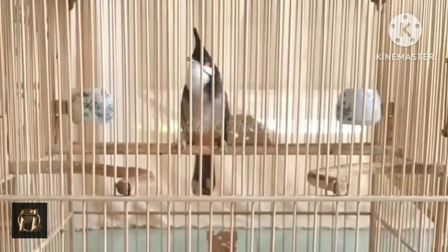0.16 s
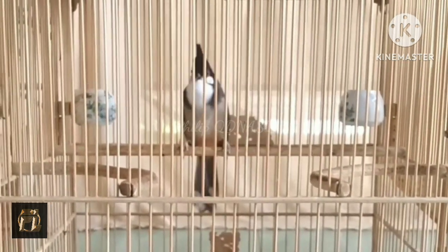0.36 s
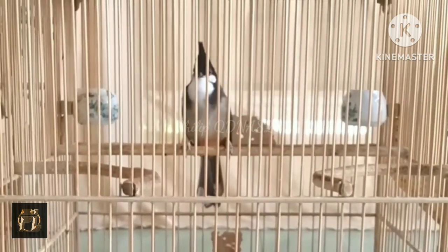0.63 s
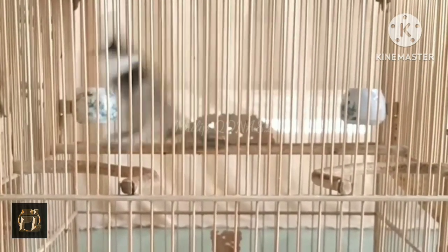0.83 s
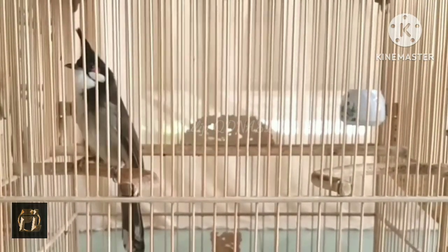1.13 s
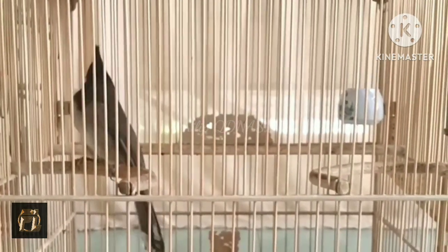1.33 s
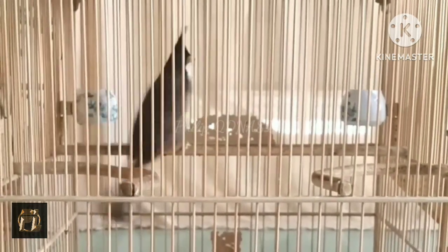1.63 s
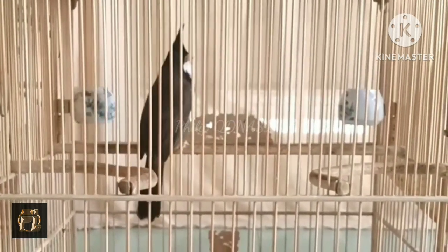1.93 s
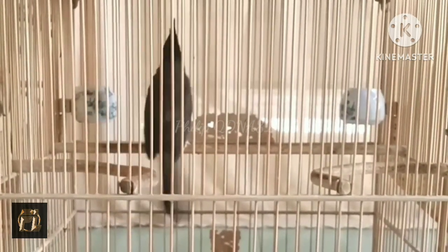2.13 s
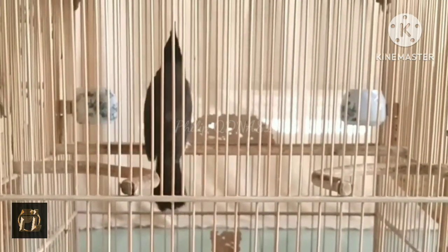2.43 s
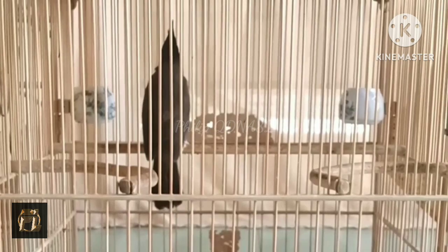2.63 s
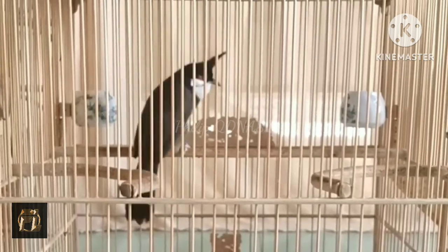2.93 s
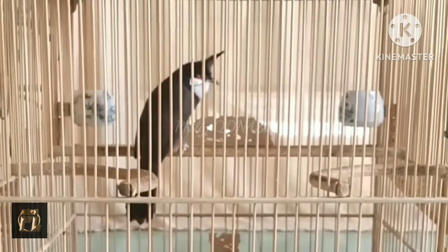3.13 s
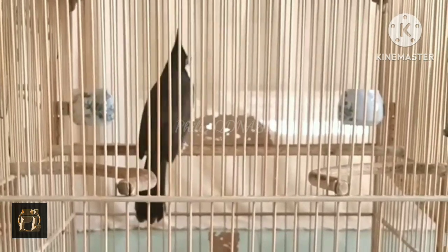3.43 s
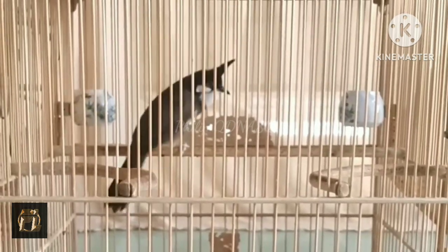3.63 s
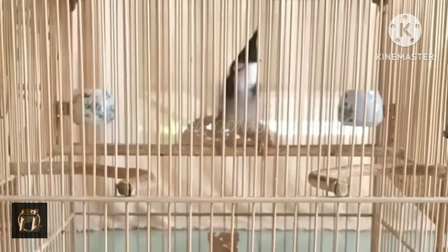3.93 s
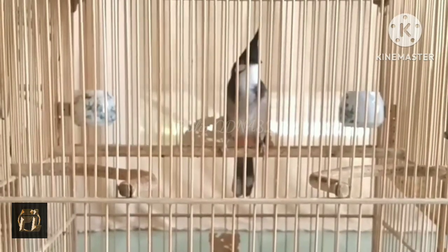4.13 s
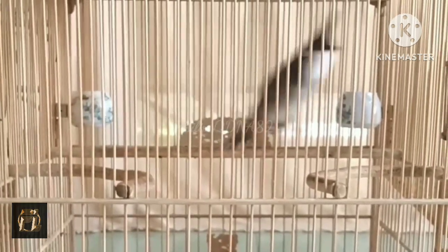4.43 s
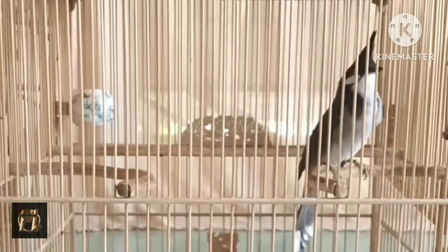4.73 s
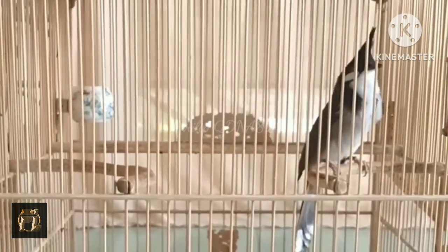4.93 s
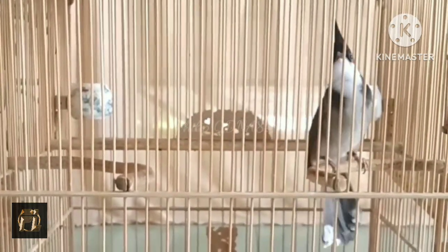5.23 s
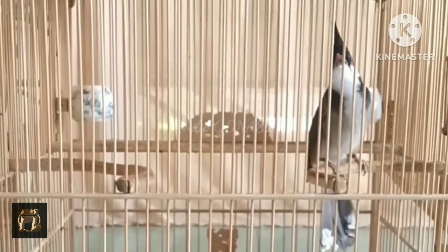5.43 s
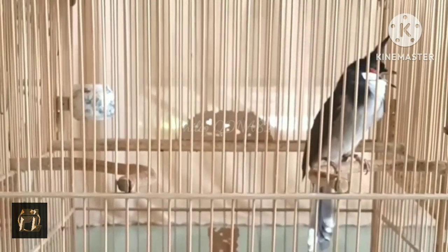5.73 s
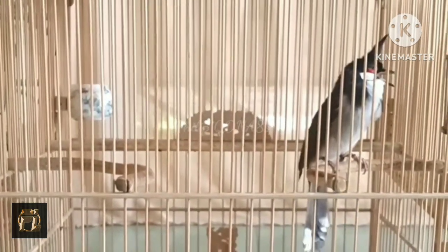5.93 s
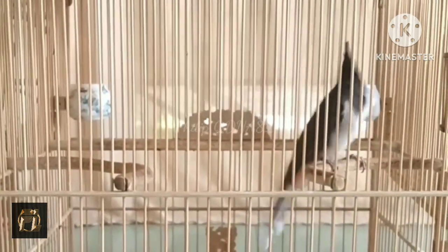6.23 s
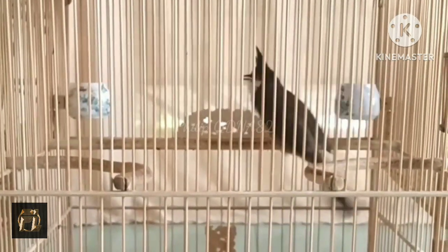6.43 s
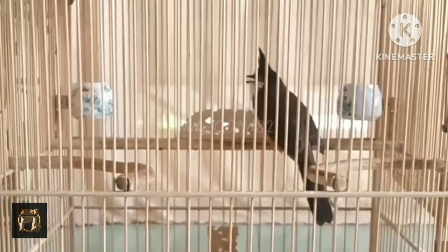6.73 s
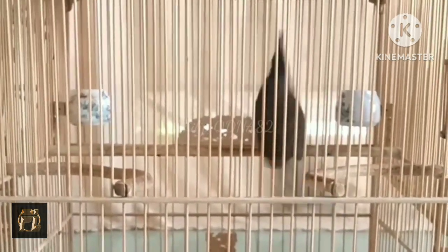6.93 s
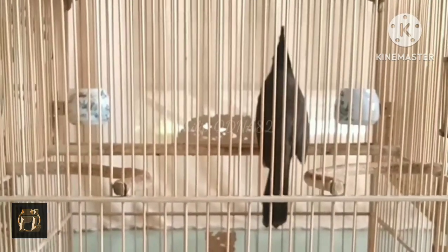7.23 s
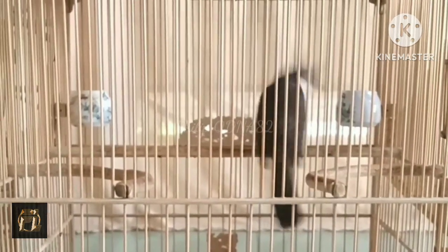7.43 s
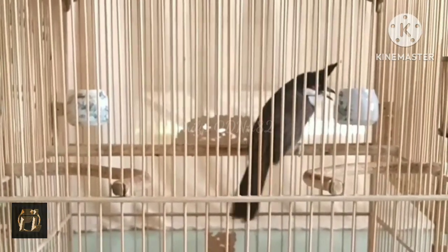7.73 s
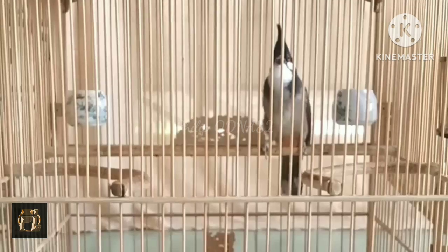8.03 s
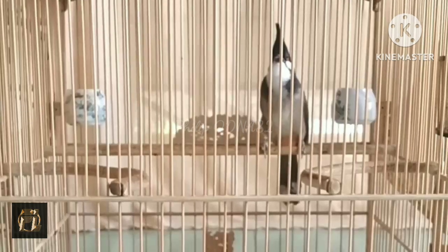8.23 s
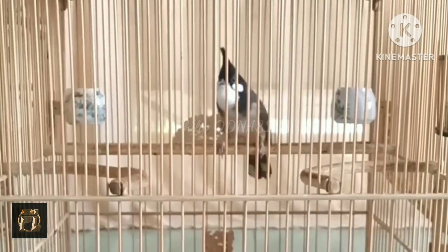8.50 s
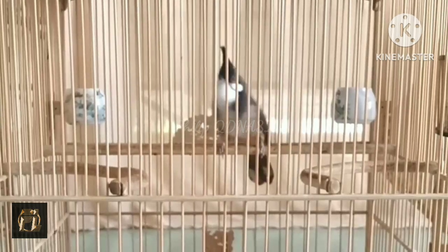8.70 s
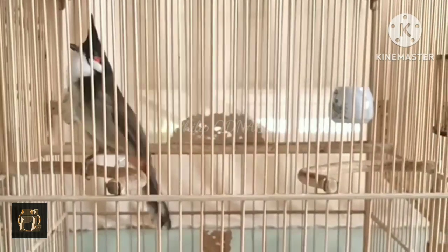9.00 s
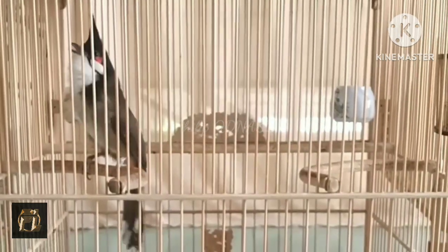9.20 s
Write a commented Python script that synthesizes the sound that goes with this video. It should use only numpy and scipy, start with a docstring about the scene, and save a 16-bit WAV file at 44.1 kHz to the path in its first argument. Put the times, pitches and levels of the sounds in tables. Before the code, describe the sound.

Close stereo pickup in a reverberant indoor room: a clipped whistle at once, a sharp call, then after a pause another call and a quick warbled run. Softer neighbouring birds chatter in the middle, followed by more single calls, a second, shorter phrase and a last call near the end. Quiet perch knocks, dry ticks, faint room hiss and a low motor hum lie beneath.

```python
"""Caged bulbul in a hard-walled room

A bulbul sings in a bamboo cage, so close that its loud notes overload the microphones (hard clipping).
Its whits and song notes are fluttering whistles; other birds answer and twitter, with more of the room.
The bird hops between perches (damped bamboo modes and claw clicks) and beats its wings (puffs of noise).
Dry ticks, a low hum and drifting room noise lie below; twice the upper range briefly drops away."""
import sys
import numpy as np
from scipy import signal
from scipy.fft import rfft, irfft
from scipy.io import wavfile
from scipy.ndimage import uniform_filter1d, map_coordinates

SR = 44100
rng = np.random.default_rng(int(sys.argv[2]) if len(sys.argv) > 2 else 0)


def put_to_file(sound):
    """Save the sound as 16-bit audio at rate SR, in the file named by the first command-line argument."""
    columns = np.atleast_2d(sound).T  # one column per channel
    safe = np.clip(columns, -1, 1)
    whole_steps = np.round(safe * 32767)
    wavfile.write(sys.argv[1], SR, whole_steps.astype(np.int16))


N = 412776


def gain_of(db):
    """Level in decibels to amplitude ratio."""
    return 10 ** (np.asarray(db) / 20)


def evened(x):
    """Normalization to an rms of one."""
    return x / np.sqrt(np.mean(x ** 2) + 1e-20)


def read(points, hz):
    """Linear interpolation of a spectrum table along a log-frequency axis."""
    f, value = np.transpose(points)
    return np.interp(np.log(hz + 1), np.log(f + 1), value)


def add(mix, s, sound):
    """Superposition: a sound is summed into the mix from time s."""
    part = mix[..., max(round(s * SR), 0):][..., :sound.shape[-1]]
    part += sound[..., :part.shape[-1]]


def wander(size, rate_hz):
    """Band-limited random fluctuation: noise of rms about one, smoothly interpolated at the given rate."""
    at = np.arange(size) * rate_hz / SR
    return map_coordinates(rng.standard_normal(4096), [at], order=3, mode="wrap")


def bulbul():
    """Directional source: the way the near bird faces sets each note's channel balance and overtones."""
    # short calls: t/s, level/dB, pitch factor, left re right/dB
    calls = [(0.305, -3, 0.985, 5.5), (1.85, -5.5, .99, 6), (5.094, -1, 1.012, 1), (6.993, -3.5, 1.0, 2),
             (9.145, -2, 1.011, 1)]
    # song notes: t/s, rise/s, fall/s, start f/Hz, main f/Hz, end f/Hz, level/dB, warble as share of pitch
    song = [(0, 0.001, 0.034, 3050, 2965, 2925, 2, 0.1), (2.152, 0.027, 0.028, 1880, 3396, 3400, 3, 0.037),
            (2.198, .016, 0.019, 2912, 2464, 2450, -3, 0.014),
            (2.322, .024, 0.055, 2098, 2358, 2288, 3.5, 0.023),
            (2.374, 0.034, 0.063, 3050, 3107, 3350, -0.5, 0.036),
            (2.456, 0.021, 0.052, 3371, 3467, 3380, 1.5, .015),
            (2.534, 0.017, 0.034, 2450, 2571, 2471, 7.5, 0.023),
            (2.598, 0.0073, 0.025, 3220, 3140, 2706, -6, 0.097),
            (2.624, .036, .052, 2770, 2253, 1867, -0.5, 0.03),
            (7.108, .036, 0.034, 1901, 2493, 2440, -7, 0.039),
            (7.303, 0.0327, 0.045, 3066, 3097, 3130, -6, 0.043),
            (7.354, .042, 0.037, 3130, 3422, 3530, -7, 0.066),
            (7.536, 0.023, 0.012, 2454, 2916, 2866, -6.5, 0.086),
            (7.635, 0.034, 0.073, 1546, 2326, 2440, -12, .008)]
    # facing and beak width during phrases: t/s, left re right/dB, overtone level/dB
    facing = [(0, 2.5, -0.5), (2.2, 2.5, -3), (2.7, 5, -0.5), (7.13, 1.5, -8), (7.35, 5, 9), (7.558, 3, 6),
              (7.68, 1, -5)]
    out, sides = np.zeros((2, N)), np.array([[.5], [-.5]])
    for s, call_db, pitch, pan_db in calls:
        add(out, s, gain_of(sides * pan_db) * whit(pitch, call_db))
    when, *pose = np.transpose(facing)
    for s, rise_s, *note in song:
        pan_db, beak_db = (np.interp(s + rise_s, when, column) for column in pose)
        add(out, s, gain_of(sides * pan_db) * song_note(rise_s, *note, beak_db))
    return out


def whit(pitch, call_db):
    """Voice break: a pure two-step upstroke turns rough and its octave flares up as it drops."""
    # contour of the call: t/s from its start, f/Hz before the pitch factor, level/dB re the call
    contour = [(0, 1180, -36.5), (.01, 1440, -17), (.019, 2020, -7.5), (.028, 2060, 1.5),
               (.037, 1850, -12.5), (.043, 2280, 3), (.057, 2380, 5), (.066, 2080, -8), (.074, 1500, -23.5),
               (.085, 1130, -44.5)]
    crack_s, crack_width_s, roughen_s = 0.0796, 0.005, .012
    t, hz, db = gesture(contour)
    flare = np.exp(-((t - crack_s) / crack_width_s) ** 2)
    octave = gain_of(-32) + gain_of(-4) * flare
    warble = 0.21 * np.exp(-abs(t - crack_s) / roughen_s)
    # subtracting db keeps the octave from following the whistle's own swell
    second_db = 20 * np.log10(octave) - db
    return syrinx(t, hz * pitch, db + call_db, warble, second_db, warble_hz=328.6, rasp_db=1.5, overtone_db=-8)


def gesture(rows):
    """Continuous articulation: the rows of a syllable are joined into smooth curves."""
    s, *columns = np.transpose(rows)
    t = np.arange(s.min(), s.max(), 1 / SR)
    return t, *(uniform_filter1d(np.interp(t, s, c), size=100) for c in columns)


def song_note(rise_s, fall_s, start_hz, main_hz, end_hz, db, warble, beak_db):
    """Frequency glide: the note swells as it scoops to its main pitch, then drifts away and fades."""
    t = np.arange(0, rise_s + fall_s, 1 / SR)
    before = np.maximum(1 - t / rise_s, 0)
    after = np.maximum(t - rise_s, 0) / fall_s
    scoop_hz = (start_hz - main_hz) * np.sin(np.pi / 2 * before) ** 2
    drift_hz = (end_hz - main_hz) * after ** 1.5
    swell_db = -16.5 * before ** 1.6 - 11 * after
    return syrinx(t, main_hz + scoop_hz + drift_hz, db + swell_db, warble, rasp_db=-7.0, overtone_db=beak_db)


def syrinx(t, hz, db, warble, second_db=-60, jitter=0.0076, warble_hz=125, rasp_db=-12, overtone_db=0):
    """Source and filter: a fluttering near-sine whistle; the throat colours its overtones and rasp."""
    # transmission of throat and open beak: f/Hz, level/dB re the whistle
    throat = [(3500, -21.5), (4800, -35.5), (6200, -37), (7600, -39.5), (9700, -30), (11000, -38),
              (12500, -70.5), (16000, -53)]
    shake_hz = warble_hz * (1 + .3 * wander(len(t), 71.6))
    shake = np.sin(2 * np.pi * np.cumsum(shake_hz) / SR)
    pitch_hz = hz * (1 + warble * shake + jitter * wander(len(t), 500))
    phase = 2 * np.pi * np.cumsum(pitch_hz) / SR
    overtones = sum(gain_of(read(throat, k * hz)) * np.sin(k * phase) for k in range(2, 6))

    bins_hz = np.fft.rfftfreq(len(t), 1 / SR)
    colour = gain_of(read(throat, bins_hz)) * (bins_hz > 1500)
    rasp = irfft(rfft(rng.standard_normal(len(t))) * colour, len(t))

    # 1.5 ms fades at both ends
    nearest_end_s = np.minimum(t - t[0], t[-1] - t)
    edges = np.sin(np.pi / 2 * np.clip(nearest_end_s / .0015, 0, 1)) ** 2
    whistle = np.sin(phase) + gain_of(second_db) * np.sin(2 * phase)
    return gain_of(db) * edges * (whistle + gain_of(overtone_db) * (overtones + gain_of(rasp_db) * rasp))


def neighbours():
    """Superposed sources: other birds answer from across the room with sliding chirps."""
    # answers: t/s, length/s, held f/Hz, slide onto it/octaves (+ is upward), level/dB before the sag
    answers = [(0, 0.041, 3706, -0.22, -19.5), (.814, 0.031, 3850, 0.42, -23),
               (0.885, 0.068, 2462, -0.22, -27), (1.439, 0.041, 4450, 0.39, -34),
               (1.483, .055, 2746, -0.36, -29.5), (1.56, 0.035, 2970, -0.59, -37.5),
               (1.699, 0.073, 3376, 0.23, -37.5), (1.759, 0.049, 4600, 0.36, -36.5),
               (2.944, 0.055, 3670, 0.33, -32.5), (3.48, 0.073, 2300, 0.73, -51),
               (3.49, 0.22, 6050, 0.27, -53), (3.569, 0.091, 4380, 0.91, -45),
               (3.76, 0.067, 4730, -0.32, -43), (3.8, 0.085, 3603, 0.29, -36.5),
               (4.02, 0.094, 3273, -.1, -37.5), (4.151, 0.017, 3820, 0.23, -36.5),
               (4.253, 0.083, 1926, -0.087, -33.5), (4.277, 0.044, 3078, 0.35, -16.5),
               (4.455, 0.071, 2466, 0.11, -18.5), (4.491, 0.054, 3122, 0.25, -18),
               (4.597, 0.05, 2180, -0.032, -21.5), (4.663, .056, 4420, 0.34, -38.5),
               (4.686, .051, 1740, -.03, -30.5), (4.784, 0.05, 2088, -0.16, -25),
               (4.85, .044, 1650, -0.11, -32.5), (4.865, 0.041, 3440, 0.072, -39),
               (4.936, 0.043, 5550, -.12, -52), (5.628, 0.026, 4020, 0.15, -27.5),
               (5.714, .058, 2477, -.22, -27.5), (6.33, .047, 2490, -.2, -43),
               (6.394, 0.04, 3560, 0.49, -38.5), (6.744, 0.053, 2660, 0.043, -41.5),
               (6.915, 0.07, 5630, -0.037, -45.5), (7.922, 0.09, 5840, 0.098, -48),
               (8.065, 0.05, 3550, -0.4, -36), (8.161, 0.054, 1962, -0.35, -26),
               (8.175, 0.061, 3300, -0.3, -33), (8.29, 0.032, 2812, .1, -18),
               (8.462, 0.057, 2333, 0.34, -24), (8.495, 0.05, 2689, -0.091, -17.5),
               (8.605, 0.081, 1660, -0.27, -29), (8.76, 0.075, 4720, 0.46, -41),
               (8.931, 0.048, 4190, -0.19, -32)]
    out = np.zeros(N)
    for s, *note in answers:
        add(out, s, chirp(*note))
    return out


def chirp(length, held_hz, slide, db):
    """Exponential glide: a far note slides onto its pitch; a deeper fall gives a stronger buzz."""
    t = np.arange(0, length, 1 / SR)
    u = t / length
    # time constant of the slide: 0.31 of the note
    hz = held_hz * 2 ** (-slide * np.exp(-u / 0.31))
    # each chirp starts strong, sags, then recovers
    sag_db = np.interp(u, [0, .25, .65, 1], [-1, -5.5, -2.0, -1.5])
    # rising notes are clean; the buzz grows with the square of the fall in octaves
    warble = 0.016 + 0.75 * min(slide, 0) ** 2
    return syrinx(t, hz, db + sag_db, warble, jitter=0.022, rasp_db=6.5, overtone_db=-5)


def twitter(count=200, note_s=.067, spread=0.26, slide_octaves=0.15, treble_db=-13):
    """Random superposition: many faint chirps, louder in bouts; the higher ones arrive weaker."""
    # bouts from the farthest cages: t/s, length/s, typical f/Hz, reference level/dB
    bouts = [(1.35, .7, 3280, -35), (3.5, 1, 2943, -48.5), (4.9, 0.87, 3160, -43.5),
             (5.9, 0.93, 2785, -46.5), (7.9, 0.62, 3215, -42)]
    lull_hz, lull_db = 3540, -53
    out = np.zeros(N)
    for k, (when, pitch, length, size, slide) in enumerate(rng.standard_normal((count, 5))):
        s = (k + 0.41 * when) * N / SR / count
        active = ((hz, db) for start, span, hz, db in bouts if 0 <= s - start < span)
        centre_hz, db = next(active, (lull_hz, lull_db))
        octaves = spread * np.clip(pitch, -1.2, 2.6) / np.log(2)
        # treble_db: loss per octave above the centre
        note_db = db + size - 1.5 + treble_db * max(octaves, 0)
        note_length = note_s * np.exp(0.27 * length)
        add(out, s, chirp(note_length, centre_hz * 2 ** octaves, slide_octaves * slide, note_db))
    return out


def hops(click_db=-43, click_s=0.0018):
    """Modal impact: claws click on a perch and damped bamboo modes ring, retuned at each landing."""
    # feet landing: t/s, level/dB, brightness/(dB per octave)
    landings = [(1.216, -31, -1.5), (3.171, -40, 16), (3.718, -38.5, -0.5), (5.524, -35, -6.5),
                (7.955, -31.5, -6)]
    # bamboo modes: f/Hz before detuning, level/dB before the brightness tilt, t60/s
    modes = [(445, -14.5, 0.034), (1007, -6, 0.032), (1105, 2, 0.023), (1667, 2, 0.056), (2255, 6.5, 0.1),
             (3640, -16, 0.03)]
    out, t = np.zeros(N), np.arange(SR // 8) / SR
    for s, db, tilt_db in landings:
        ring = np.zeros(len(t))
        for (hz, level, t60), detune in zip(modes, rng.uniform(.92, 1.08, len(modes))):
            mode_db = level + tilt_db * np.log2(hz / 2000) - 60 * t / t60
            ring += gain_of(mode_db) * np.sin(2 * np.pi * hz * detune * t)
        click = gain_of(click_db + 2 * tilt_db) * rng.standard_normal(len(t)) * np.exp(-t / click_s)
        add(out, s, gain_of(db) * (.5 * ring + click))
    return out


def wings(beat_hz=22, low_hz=130, high_hz=380):
    """Amplitude-modulated noise: each wingbeat pushes a soft low puff of air."""
    # bursts of wingbeats: t/s, length/s, level/dB before the room
    flutters = [(6.52, 0.15, -50)]
    band = signal.butter(2, [low_hz, high_hz], "band", fs=SR, output="sos")
    out = np.zeros(N)
    for s, length, db in flutters:
        t = np.arange(0, length, 1 / SR)
        rush = signal.sosfilt(band, rng.standard_normal(len(t)))
        beats = np.sin(np.pi * beat_hz * t) ** 2
        add(out, s, gain_of(db) * evened(rush * beats * np.hanning(len(t))))
    return out


def ticks(decay_s=0.00081, top_hz=8500):
    """Impulsive noise: tiny dry clicks decay exponentially below a soft treble limit."""
    # clicks: t/s, level/dB before the low-pass
    clicks = [(0.965, -26), (0.979, -28), (2.788, -17.5), (4.846, -29)]
    out, t = np.zeros((2, N)), np.arange(400) / SR
    for s, db in clicks:
        add(out, s, gain_of(db) * rng.standard_normal((2, len(t))) * np.exp(-t / decay_s))
    return signal.sosfilt(signal.butter(2, top_hz, fs=SR, output="sos"), out)


def hum(waver=.012, throb=.35):
    """Modulated tones: a motor hums in the building, its partials wavering in pitch and level."""
    # partials: mean f/Hz, rms level/dB
    partials = [(98, -56), (146.5, -53.5), (221, -53), (296, -69.5), (372, -69.5)]
    out = np.zeros(N)
    for hz, db in partials:
        swell = 1 + throb * wander(N, 9)
        phase = 2 * np.pi * np.cumsum(hz * (1 + waver * wander(N, 6))) / SR
        out += gain_of(db) * evened(swell * np.sin(phase))
    return out


def air(patch_db=2.7, rumble_pan_db=-5):
    """Partly coherent shaped noise: low rumble and faint hiss of the room, drifting in patches."""
    # relative noise spectrum: f/Hz, level/dB
    spectrum = [(12, -32.5), (20, 1), (60, -12.5), (228, -16), (301, -22.5), (377, -23.5), (849, -31.5),
                (1260, -34), (2260, -25.5), (3740, -34.5), (4420, -35), (6910, -43), (8650, -42),
                (14300, -66.5), (16000, -97)]
    # coherence of the channels: f/Hz, left-right correlation
    likeness = [(30, 0.12), (130, 0.95), (300, 0.48), (700, 0.55), (3000, 0.052)]
    frames, hz = N // 512 + 5, np.fft.rfftfreq(2048, 1 / SR)
    a, b, c, d, patches = rng.standard_normal((5, frames, len(hz)))
    # smooth the patches over time, then over frequency
    patches = uniform_filter1d(patches, size=10, axis=0)
    patches = evened(uniform_filter1d(patches, size=24, axis=1))

    same = np.clip(read(likeness, hz), -1, 1)
    left = a + 1j * b
    right = same * left + np.sqrt(1 - same ** 2) * (c + 1j * d)
    # the rumble leans to the right
    pan = gain_of(.5 * rumble_pan_db / (1 + (hz / 100) ** 2))
    colour = gain_of(read(spectrum, hz) + patch_db * patches * hz / (hz + 400))
    z = np.array([left * pan, right / pan]) * colour
    noise = signal.istft(z.swapaxes(1, 2), nperseg=2048, noverlap=1536)[1][:, :N]
    return gain_of(-40.5) * evened(noise)


def room(x, direct_db, early_db, tail_db, early_s=0.0067, build_s=0.0021):
    """Reverberation: direct sound, a burst of near-wall reflections, and a tail dying band by band."""
    # reverberation time: f/Hz, t60/s
    decay = [(300, 0.17), (1200, 0.52), (2600, 0.68), (4000, 0.61), (7000, 0.54), (14000, 0.38)]
    t = np.arange(SR) / SR
    # sparse random echoes: 4000 per second in the tail, 900 among the early reflections
    taps = rng.choice([-1., 1.], (2, SR)) * (rng.random((2, SR)) < 4000 / SR)
    hz, frame_s, z = signal.stft(taps, SR, nperseg=256)
    decay_db = -60 * frame_s / read(decay, hz)[:, None]
    tail = signal.istft(z * gain_of(decay_db), SR)[1][:, :SR]
    tail *= 1 - np.exp(-(t / build_s) ** 2)
    early = rng.standard_normal((2, SR)) * (rng.random((2, SR)) < 900 / SR)
    early *= np.exp(-t / early_s) * (t > .002)

    response = np.zeros((2, SR))
    for db, part in [(early_db, early), (tail_db, tail)]:
        response += gain_of(db) * part / np.linalg.norm(part, axis=1, keepdims=True)
    # the sound reaches the right microphone five samples before the left
    response[[0, 1], [5, 0]] += gain_of(direct_db)
    return signal.fftconvolve(np.atleast_2d(x), response, axes=1)[:, :N]


def dips(x, above_hz=1000):
    """Time-varying high shelf: the upper range drops away briefly at listed moments."""
    # drops: t/s, length/s, depth as level/dB
    drops = [(2.77, 0.0081, -19), (3.336, 0.14, -18)]
    treble = signal.sosfiltfilt(signal.butter(4, above_hz, "high", fs=SR, output="sos"), x)
    t = np.arange(N) / SR
    dip_db = sum(db * np.interp((t - s) / length, [0, .03, .9, 1.3], [0, 1, 1, 0])
                 for s, length, db in drops)
    return x + treble * (uniform_filter1d(gain_of(dip_db), size=100) - 1)


def scene():
    """Direct-to-reverberant ratio: the farther a bird sits, the more of its sound is room."""
    near = room(bulbul(), direct_db=-1.0, early_db=-1.5, tail_db=-2.0)
    # the answers lean to the left by 2 dB
    far = room(neighbours(), direct_db=-7, early_db=0.5, tail_db=3.5) * gain_of([[1.], [-1.]])
    farthest = room(twitter(), direct_db=-17.5, early_db=-18.5, tail_db=3.5)
    cage = room(hops() + wings(), direct_db=-3.0, early_db=-7, tail_db=-4.5)
    return near + far + farthest + cage + ticks() + hum() + air()


def record(dry):
    """Overload and band limiting: each channel clips hard at full scale, then passes a 15.8 kHz low-pass."""
    clipped = np.clip(dips(dry), -1, 1)
    low_pass = signal.firwin(63, 15800, window=("kaiser", 6), fs=SR)
    return signal.oaconvolve(clipped, low_pass[None], "same")


dry = scene()
out = record(dry)
put_to_file(out)
```